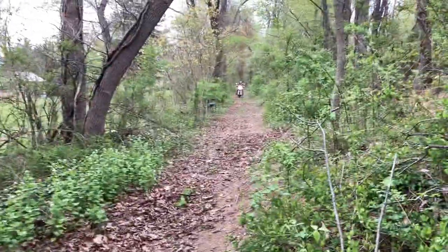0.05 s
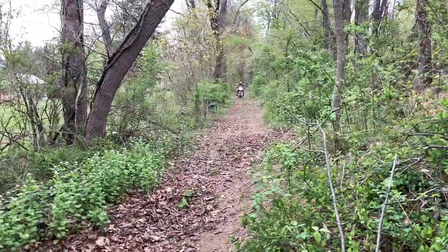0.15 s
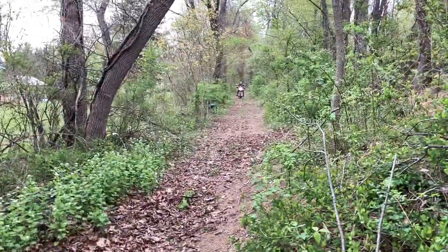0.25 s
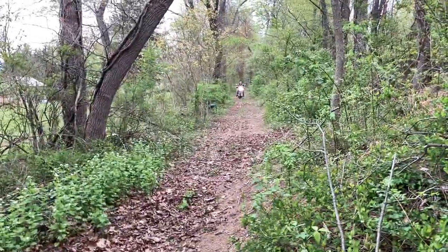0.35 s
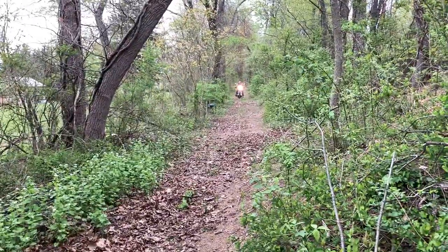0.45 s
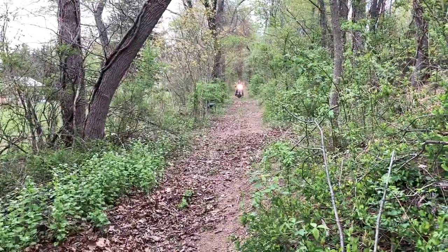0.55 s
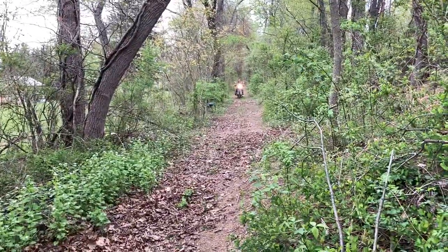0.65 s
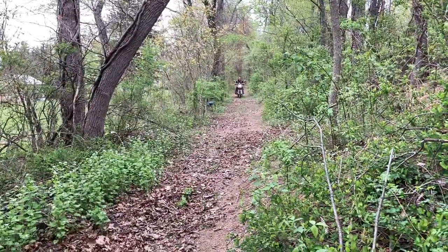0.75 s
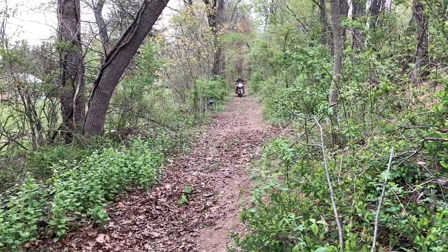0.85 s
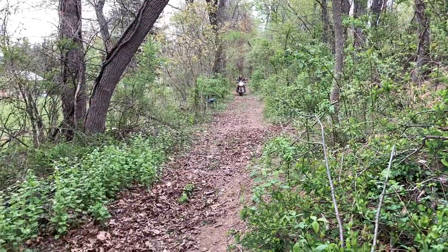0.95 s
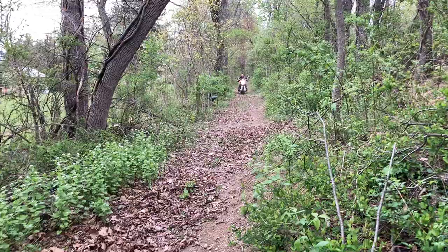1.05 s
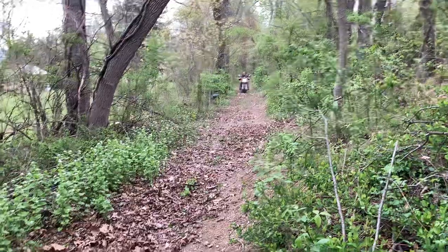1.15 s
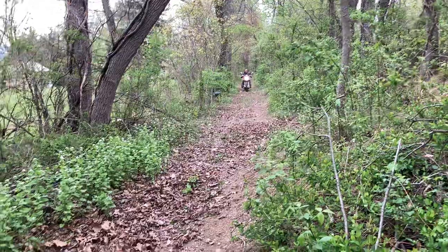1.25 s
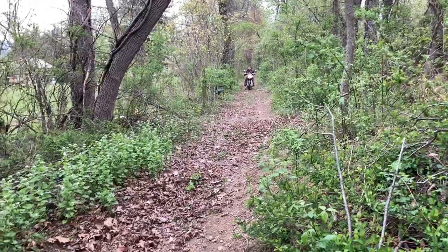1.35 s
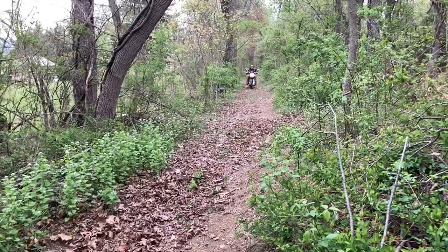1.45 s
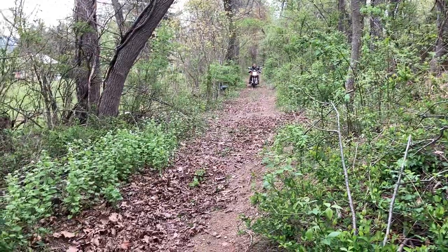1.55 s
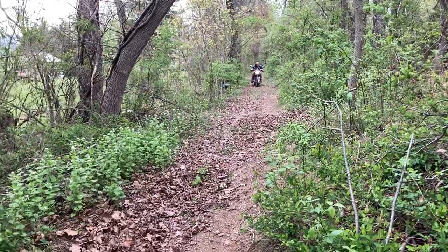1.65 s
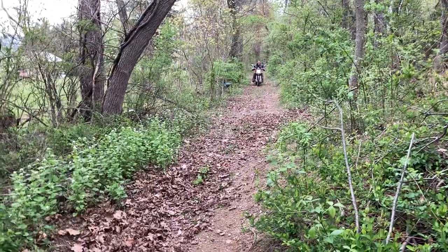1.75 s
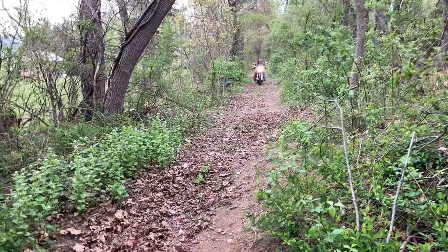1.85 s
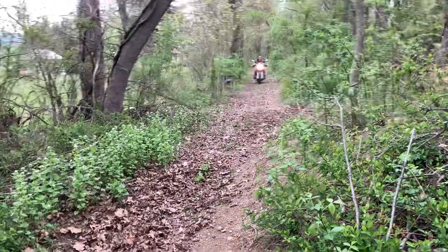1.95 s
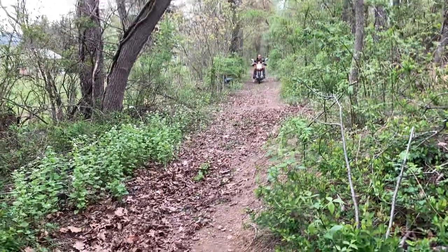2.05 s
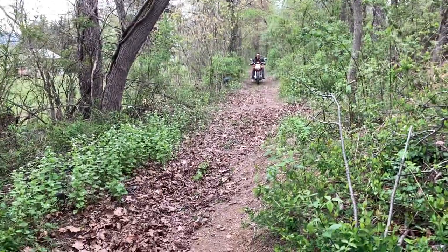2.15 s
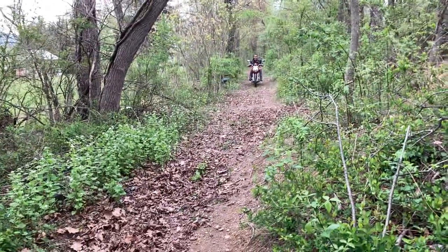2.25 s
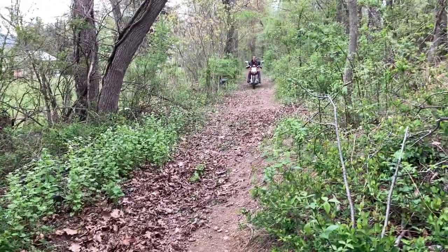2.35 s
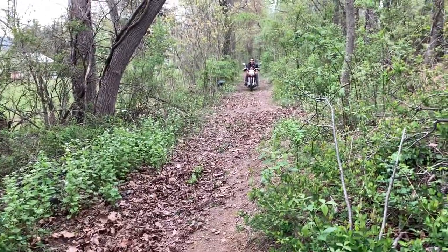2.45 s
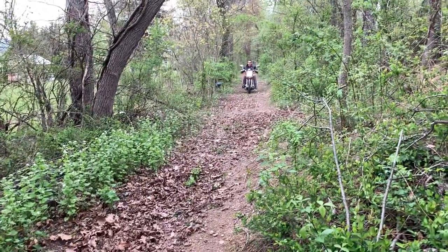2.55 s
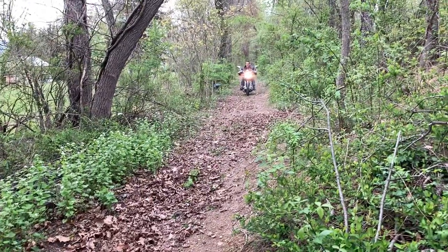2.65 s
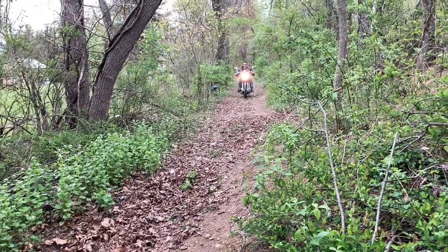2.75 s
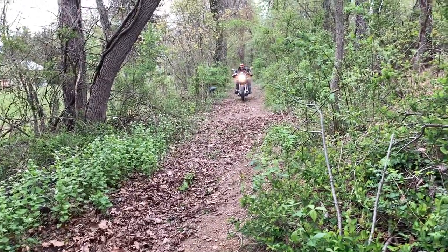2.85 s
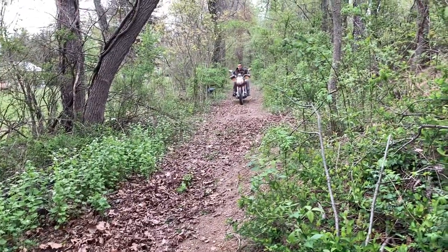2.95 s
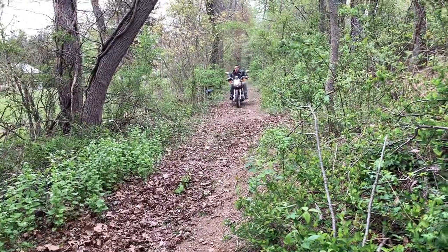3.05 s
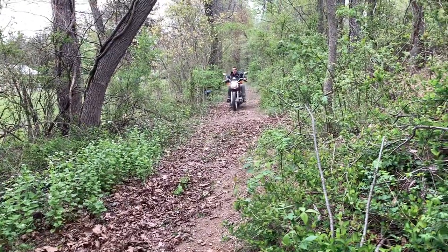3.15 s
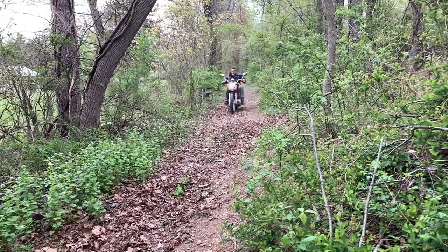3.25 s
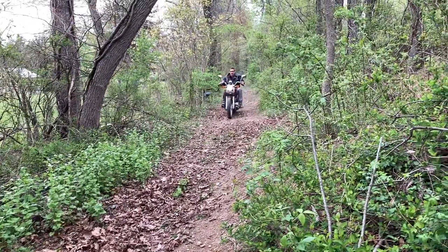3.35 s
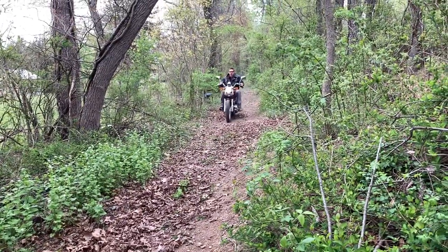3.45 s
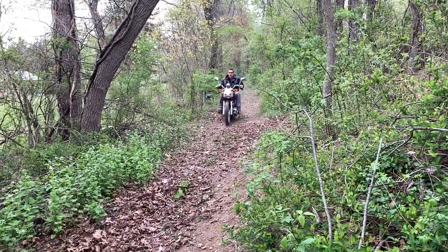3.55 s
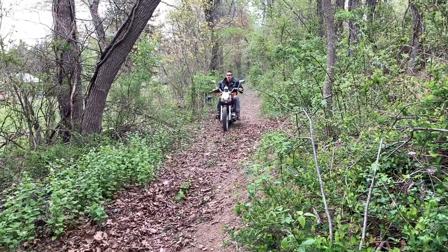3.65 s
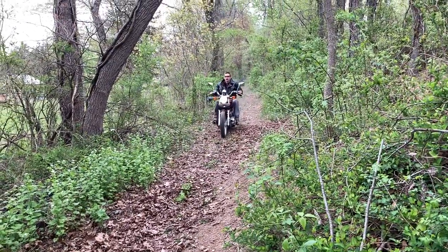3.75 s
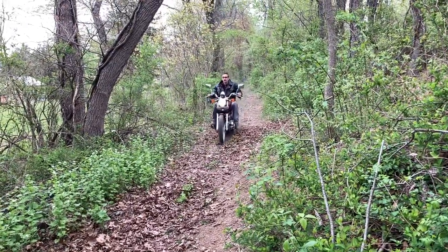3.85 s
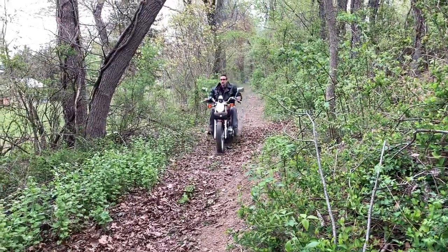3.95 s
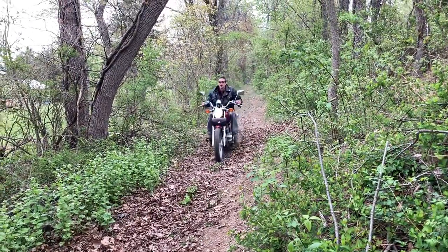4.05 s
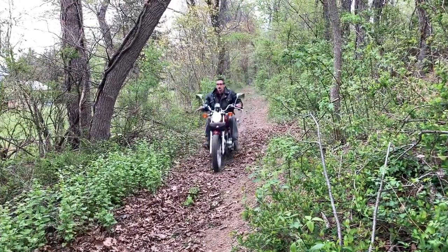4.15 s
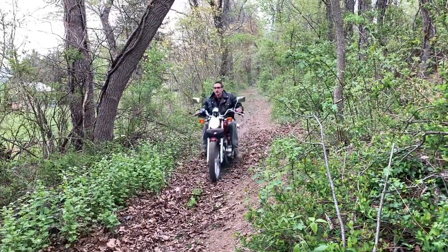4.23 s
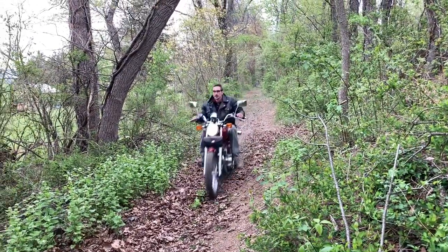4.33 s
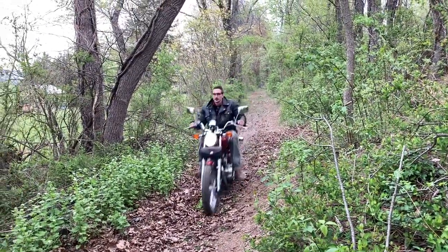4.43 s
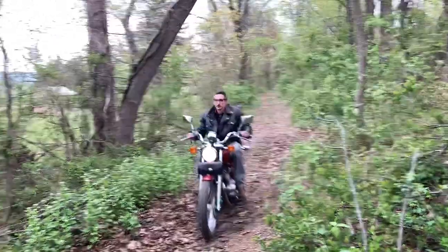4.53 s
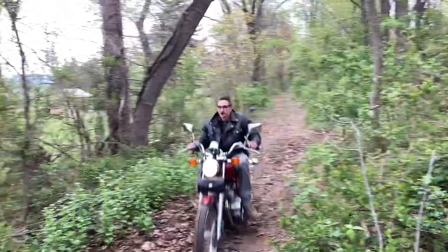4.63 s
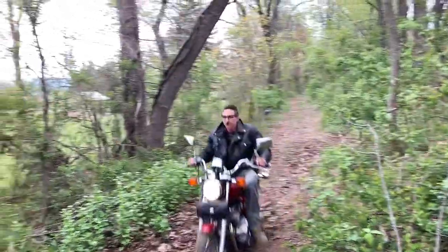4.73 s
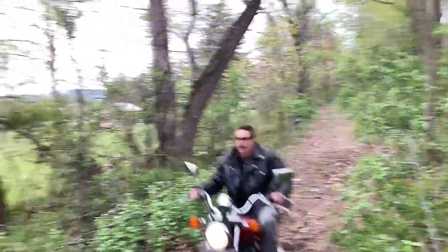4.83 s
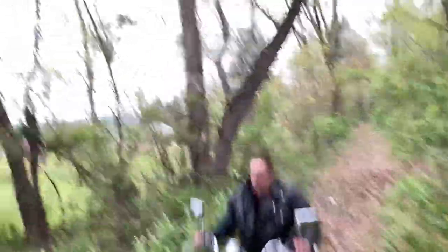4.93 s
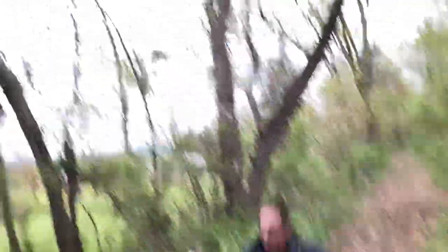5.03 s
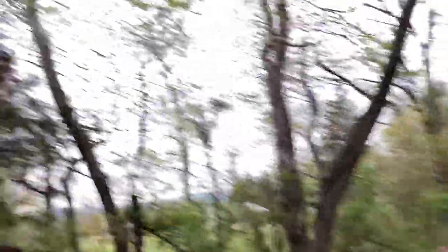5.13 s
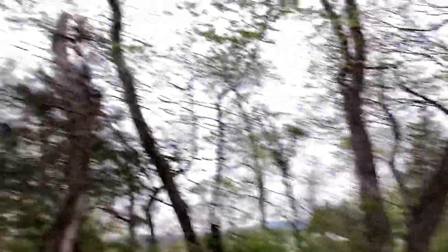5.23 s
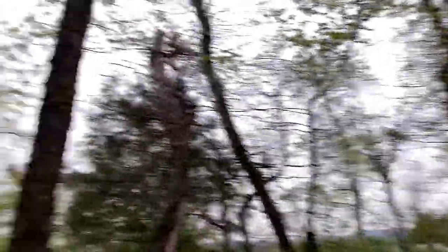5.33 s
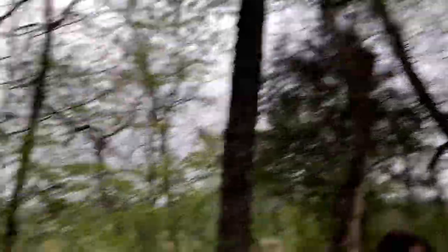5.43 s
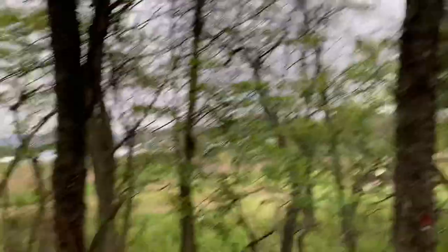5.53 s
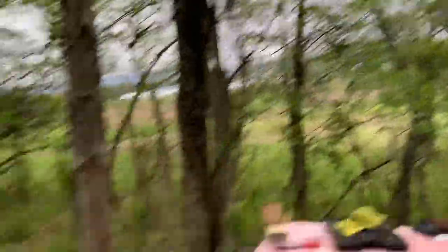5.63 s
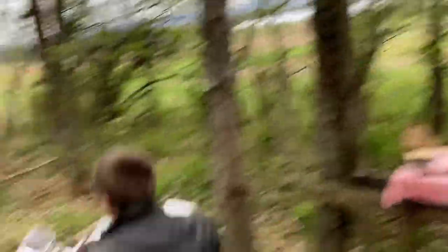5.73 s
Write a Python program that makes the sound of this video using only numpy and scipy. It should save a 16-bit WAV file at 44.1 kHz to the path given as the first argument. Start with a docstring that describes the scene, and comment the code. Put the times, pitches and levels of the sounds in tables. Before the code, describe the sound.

A twin-cylinder motorcycle burbles closer along a leafy trail, passes very near with leaves crunching and twigs snapping, its revs sagging to slow chugs.

```python
"""Motorcycle passing on a leafy woodland trail

A twin-cylinder machine comes along the trail at uneven throttle and passes close by a handheld stereo microphone,
its revs sagging. Locked tones make the exhaust orders, and ringing pulses the unequal firings; noise and ticks ring
the metal, and a sine makes the gear whine. Flickering noise with crackles is dry leaves under the tyres, short
bursts are twigs and a jolting frame, damped swings are stumbles in the firing, and low noise is air shoved at the mic.
"""
import sys
import numpy as np
from scipy import signal
from scipy.fft import rfft, irfft, next_fast_len
from scipy.io import wavfile
from scipy.ndimage import uniform_filter1d

SR = 44100
rng = np.random.default_rng(int(sys.argv[2]) if len(sys.argv) > 2 else 0)


def master_out(mix):
    """Clip the mix to full scale and print it as 16-bit PCM to the path in sys.argv[1]."""
    frames = np.transpose(np.atleast_2d(mix))
    ceiling = np.clip(frames, -1, 1)
    pcm = np.round(ceiling * 32767).astype(np.int16)
    wavfile.write(sys.argv[1], SR, pcm)


N = 255053

# Low push of air at the microphone: (time [s], level [dB])
AIR_PUSH = [(0, -62), (3, -53.5), (4.5, -58.5), (5.0, -48.5), (5.3, -44), (5.55, -28), (5.68, -31),
            (5.78, -21)]
# Twigs snapping: (time [s], level before the trim in snaps [dB], time to fall 60 dB [s])
TWIG_SNAPS = [(2.0384, -25.5, 0.1), (5.025, -25, 0.048), (5.5847, -20, 0.1), (5.6382, -20.5, 0.07),
              (5.6884, -24, 0.061), (5.712, -27.5, 0.071), (5.7534, -28.5, 0.052)]
# Spectrum of leaves under the tyres: (frequency [Hz], relative level [dB])
LEAF_SPECTRUM = [(300, -67), (800, -3.5), (2300, -11), (3500, -10.5), (4800, -1), (5700, -1), (6300, -1.5),
                 (6900, 5.5), (7700, 5), (8500, -1), (9400, 3), (10700, 1), (12500, -8.5), (14000, -14),
                 (16000, -17.5)]
# Single metal tones flaring up: (time [s], frequency [Hz], width [Hz], level [dB], half length [s])
METAL_FLARES = [(3.58, 1466, 70.2, -41, 0.13), (4.979, 2340, 90.1, -29.5, 0.089),
                (5.164, 1273, 49.96, -27, 0.028), (5.254, 1042, 30, -28, 0.046),
                (5.143, 2540, 200, -28, 0.03), (5.332, 2570, 150, -32, 0.073)]
# Jolts of the frame over a root: (time [s], level before smoothing [dB], time to fall 60 dB [s])
FRAME_JOLTS = [(5.45, -19.5, 0.23), (5.575, -23.5, 0.24), (5.6, -16.5, 0.19), (5.62, -33, 0.25),
               (5.655, -25.5, 0.23), (5.712, -29, 0.21), (5.735, -29, 0.23)]
# Modes of the rattling frame: (frequency [Hz], width [Hz], relative level [dB])
FRAME_MODES = [(356, 48, 10), (567, 140, -4.5), (802, 67, -1), (1080, 43, -18)]
# Modes of the engine cases (first four) and cooling fins: (frequency [Hz], width [Hz], relative level [dB])
METAL_MODES = [(924, 224, -6.5), (1343, 135, -3.5), (1483, 82, -1.5), (1966, 174, -4), (2235, 88, 0.5),
               (2655, 154, 1.5), (2907, 43, 2.5), (3223, 510, -2.5), (4096, 350, -2), (4666, 490, -4.5)]
# Modes of the rasping flank: (frequency [Hz], width [Hz], relative level [dB])
RASP_MODES = [(1000, 63, 3), (1187, 72, -1), (1276.6, 20, 0), (1650, 120, -2.5), (2158.4, 145, 2.5),
              (2370, 200, -0.5), (2345, 54, 6), (2633, 15, 0)]
# Resonances of the exhaust pipe: (frequency [Hz], width [Hz], relative level [dB])
PIPE_MODES = [(172, 154, 0), (550, 160, -9), (780, 72, -9.5)]
# Stumbles in the firing, each a dull puff with a dent in the note:
# (time [s], level before the band-pass [dB], pitch [Hz], time to fall 60 dB [s], dent of the lowest order [dB])
STUMBLES = [(2.299, -27, 140, 0.049, -1), (3.624, -20, 134.9, 0.058, 2), (4.178, -17.5, 120.1, .06, 0.5),
            (4.615, -8, 130, 0.067, 4), (5.003, -4.5, 147, 0.027, 2), (5.445, -12, 129.9, 0.055, 1.5),
            (5.65, -3.5, 107.7, 0.12, 2.5)]
# The rider's hand: (time [s], firing rate [Hz], load on the engine [dB])
THROTTLE_HAND = [(0, 95.3, -1.5), (.37, 93.7, -1.5), (.69, 93.6, -1), (.87, 87.55, -1), (1.05, 96.6, 0),
                 (1.17, 93.4, 0), (1.35, 93.6, -0.5), (1.53, 91.74, -1), (1.66, 93.8, -0.5),
                 (1.8, 93.95, 0.5), (1.95, 97.4, 0.5), (2.12, 88.9, 0), (2.18, 90.8, -0.5),
                 (2.42, 84.4, -1), (2.62, 90.4, -1), (2.74, 96.3, 2), (2.78, 98.1, 1), (2.9, 91, 1.5),
                 (3.12, 91.5, 0.5), (3.27, 94.6, 1.5), (3.6, 92.2, 1.5), (3.75, 80.75, -0.5),
                 (4.15, 79.5, -0.5), (4.28, 80.93, -.5), (4.53, 80.1, -1), (4.65, 73.4, -2.5),
                 (4.8, 79.93, -0.5), (4.92, 85.53, 0.5), (5.03, 77.8, 0.5), (5.15, 69.9, -.5),
                 (5.28, 72.96, 0), (5.42, 64.9, -0.5), (5.57, 49.67, 1), (5.66, 37, 0.5),
                 (5.78, 35.2, -1.5)]

# How each part carries to the microphone: (time abreast [s], nearest distance [m], level at 1 m [dB],
# loss per doubling of distance [dB], share of the load [dB per dB], fade once past [dB per s])
TYRE_CARRY = (5, 1.15, -24.5, 6, 0.74, 6.5)
CRISP_CARRY = (5, 2.4, -24.5, 10, 1, -2.5)
WHINE_CARRY = (6, 11, -32, 5.5, 4.5, 3)
CASE_CARRY = (5, 1.56, -26, 6, 1.68, -3)
FIN_CARRY = (5.08, 0.77, -32, 4, 1.56, -2)
RASP_CARRY = (5, 1.3, -23.5, 10, -0.7, -1)
FRONT_CARRY = (5, 3, -28, 6, 1.7, -4)
EXHAUST_CARRY = (5.3, 2.1, 0, 6, 1, 0)

# Exhaust colour, held for a stretch: (start [s], orders 1 to 5 at 1 m [dB] x 5, cylinder mismatch at 1 m [dB])
EXHAUST_COLOUR = [(0, -2.5, -16.5, -21, -29, -33, -29), (.76, -2.5, -19, -19, -22.5, -31, -30),
                  (1.25, -2.5, -15, -22, -23, -28.5, -24.5), (1.72, -2.5, -13, -18.5, -22, -33, -26),
                  (2.03, -2.5, -19.5, -22.5, -20, -29.5, -26), (2.68, -4, -16, -15.5, -21, -27.5, -27),
                  (3.22, -5, -16.5, -15, -18, -29, -27.5), (3.625, -9, -4.5, -14.5, -18, -32.5, -24),
                  (4.178, -6.5, -18.5, -17, -16, -32.5, -20.5), (4.605, -5, -13, -13.5, -16, -28, -20.5),
                  (4.999, -9.5, -8, -20, -23.5, -30.5, -17), (5.435, -8.5, -7, -23, -33, -33, -19.5),
                  (5.58, -21, -10, -14.5, -29, -32.5, -39)]
# Overtones sliding against the lowest order as the path from the pipes turns:
# (time [s], lag [rad], spread [rad])
OVERTONE_SLIDE = [(0, 0, .27), (3.55, 0, .2), (3.7, 2, .15), (4.2, 2.2, 0), (4.95, 2.4, 0), (5.05, 3.6, 0),
                  (5.78, 4.5, 0)]
# Brief drops of the second order: (time [s])
SECOND_ORDER_DROPS = [.05, .25, .46, 1.41, 1.58, 1.74, 1.87, 1.98, 2.17, 2.33, 2.62]
# Ebbs of the lowest order: (time [s])
LOWEST_ORDER_EBBS = [.4, .68, 1.05, 1.41, 1.68, 1.97, 2.38]
# Slow flicker of orders 1 to 8 with distance along the trail: (spread [dB per m])
ORDER_FLICKER = [.01, 0.057, 0.052, 0.06, 0.096, 0.13, 0.23, 0.17]
# Orders 6 to 8 against order 5: (level [dB])
UPPER_ORDERS = [-5, -9, -13.5]

# Stereo phase of left against right; the treble is wide, partly in opposite phase:
# (frequency [Hz], phase [rad])
STEREO_PHASE = [(20, 0), (4400, 0), (5600, 2.2), (6100, 1.8), (6400, 0), (7300, -.1), (8400, -2.9),
                (8900, -np.pi), (9500, -3.3), (10700, -5.7), (11200, -2 * np.pi), (11600, -2 * np.pi),
                (13000, -8.7), (13300, -3 * np.pi), (14300, -3 * np.pi), (15100, -4 * np.pi)]
# Left channel against the right: (frequency [Hz], level [dB])
STEREO_BALANCE = [(60, -1), (200, -0.51), (700, 1), (2400, 1), (4400, 0.087)]
# Diffuse stereo part against the centred part: (frequency [Hz], level [dB])
DIFFUSE_SHARE = [(30, 14), (70, -30.5), (270, -20), (740, -12), (1500, -8), (3000, -4.5), (3600, -18.5),
                 (5300, -5.5), (6200, 5), (6800, -66), (8100, 4), (8900, -34), (9500, -22), (10400, 15.5),
                 (11400, -35), (12700, -20), (13300, -24), (14200, -30), (14700, 14), (15500, -13)]

SPEED_M_PER_S = 5.05
TURN_S = 0.026  # time for one exhaust colour to turn into the next
STUMBLE_HALF_S, STUMBLE_LEAD_S = 0.028, 0.013  # the dent is centred ahead of its puff
SAG_PER_ORDER = 0.47  # each higher order sags more by this share
DROPOUT_DB, DROPOUT_HALF_S = 15.5, 0.026
EBB_DB, EBB_HALF_S = 3, 0.1
FLICKER_PER_S = 8.72
WHINE_ORDER = 21  # multiple of the firing rate
CUTOFF_HZ = 16284


def amp(db):
    """Amplitude ratio of a level in dB."""
    return 10 ** (np.asarray(db) / 20)


def rms_one(x):
    """Scale a signal to an RMS of 1."""
    return x / np.sqrt(np.mean(x ** 2) + 1e-20)


def in_time(rows):
    """Columns of a timed table, joined by straight lines at every sample."""
    s, *columns = np.transpose(rows)
    return [np.interp(np.arange(N) / SR, s, c) for c in columns]


def at_hz(points, hz):
    """Curve of a spectral table, straight over log frequency."""
    point_hz, values = np.transpose(points)
    return np.interp(np.log(hz + 1), np.log(point_hz), values)


def drift(rate):
    """Slow chance of spread 1, changing about rate times a second."""
    r = np.exp(-2 * np.pi * rate / SR)
    slow = signal.lfilter([1], [1, -2 * r, r * r], rng.standard_normal(N + SR))
    return rms_one(slow[SR:])  # the first second is run-in


def resonate(x, modes):
    """Parallel resonances with alternating signs."""
    out = 0
    for k, (hz, width_hz, level_db) in enumerate(modes):
        r = np.exp(-np.pi * width_hz / SR)
        b = (1 - r * r) / 2 * np.array([1, 0, -1])
        a = [1, -2 * r * np.cos(2 * np.pi * hz / SR), r * r]
        out = out + (-1) ** k * amp(level_db) * signal.lfilter(b, a, x)
    return out


def band(x, low_hz, high_hz, order=2):
    """Band-pass filter."""
    sos = signal.butter(order, [low_hz, high_hz], "band", fs=SR, output="sos")
    return signal.sosfilt(sos, x)


def bursts(rows, crack_db):
    """Level of sudden events that die away, each with a short crack on its front."""
    level = np.zeros(N)
    for s, level_db, t60 in rows:
        i = round(s * SR)
        t = np.arange(N - i) / SR
        level[i:] += amp(level_db - 60 * t / t60)
        level[i:] += amp(level_db + crack_db - 60 * t / 0.032)
    return level


def dips(rows, half_s):
    """Short bell-shaped changes of level in dB, from rows of time and depth; a negative depth lifts."""
    t = np.arange(N) / SR
    return -sum(depth_db * np.exp(-((t - s) / half_s) ** 2) for s, depth_db in rows)


def carried(part, load_db):
    """Level of a part in dB: loss with distance, engine load, and a fade or rise once it has gone by."""
    abreast_s, nearest_m, level_db, loss_db, share, fade_db_per_s = part
    past = np.arange(N) / SR - abreast_s
    metres = np.hypot(SPEED_M_PER_S * past, nearest_m)
    return level_db - loss_db * np.log2(metres) + share * load_db - fade_db_per_s * np.maximum(past, 0)


def firings(turns):
    """Number of the current firing, and a mark on the sample where each one falls."""
    count = np.floor(turns).astype(int)
    return count, np.diff(count, prepend=0) > 0


def air_push():
    """Air shoved at the microphone is low-frequency noise."""
    level_db, = in_time(AIR_PUSH)
    return amp(level_db) * rms_one(band(rng.standard_normal(N), 37.6, 73, order=4))


def snaps():
    """Each twig gives a crack, then bright splinter noise that dies fast."""
    splinters = rms_one(band(rng.standard_normal(N), 1400, 7500, order=1))
    return bursts(TWIG_SNAPS, crack_db=5.0) * splinters * amp(-8.5)


def leaves(body_db, crisp_db, per_s=2500, spread_db=3.0, crackle=0.55, patchy_db=1.06, crisp_hz=8600):
    """Crushed leaves hiss densely with uneven crackles; bands flicker apart, the crisp top with its own level."""
    sizes = amp(spread_db * np.minimum(rng.exponential(1, N), 5)) * rng.choice([-1, 1], N)
    grains = rms_one(sizes * (rng.random(N) < per_s / SR))
    hz = np.fft.rfftfreq(N, 1 / SR)
    crush = rfft(rng.standard_normal(N) + crackle * grains) * amp(at_hz(LEAF_SPECTRUM, hz))
    edges = np.geomspace(250, 17000, 13)
    together = drift(8)
    body, crisp = np.zeros(N), np.zeros(N)
    for low, high in zip(edges, edges[1:]):
        flicker = amp(patchy_db * (0.61 * together + drift(56)))
        part = crisp if low > crisp_hz else body
        part += flicker * irfft(crush * (hz >= low) * (hz < high), N)
    return amp(body_db) * rms_one(body) + amp(crisp_db) * rms_one(crisp)


def flares():
    """Single metal tones are noise in one narrow mode, swelling and fading."""
    t = np.arange(N) / SR
    out = np.zeros(N)
    for s, hz, width_hz, level_db, half_s in METAL_FLARES:
        tone = rms_one(resonate(rng.standard_normal(N), [(hz, width_hz, 0)]))
        out += amp(level_db) * np.exp(-((t - s) / half_s) ** 2) * tone
    return out


def jolts():
    """Loose parts shaken over a root sound in the modes of the frame."""
    rattle = rms_one(resonate(rng.standard_normal(N), FRAME_MODES))
    # averaging over 600 samples lets each shake build over some 10 ms
    return rattle * uniform_filter1d(bursts(FRAME_JOLTS, crack_db=-15.0), size=600)


def whine(turns, level_db, waver_db=1.0, wobble=.25):
    """A gear meshes at a fixed multiple of the firing rate: a thin, unsteady tone (wobble in radians)."""
    phase = 2 * np.pi * WHINE_ORDER * turns + wobble * drift(15)
    return amp(level_db + waver_db * drift(4)) * np.sin(phase)


def clatter(turns, level_db, modes, gate, tick, patchy_db, per_s):
    """Gear noise swelling on each firing, and a valve tick with it, ring metal modes that come and go apart."""
    gears = rng.standard_normal(N) * (1 + gate * np.cos(2 * np.pi * turns))
    _, fires = firings(turns)
    ticks = rms_one(fires * (1 + 0.39 * rng.standard_normal(N)))
    drive = gears + tick * ticks
    rings = 0
    for k, mode in enumerate(modes):
        rings = rings + (-1) ** k * amp(patchy_db * drift(per_s)) * resonate(drive, [mode])
    return amp(level_db) * rms_one(rings)


def puffs():
    """Each stumble in the firing is one damped swing of air."""
    out = np.zeros(N)
    for s, level_db, hz, t60, _ in STUMBLES:
        i = round(s * SR)
        t = np.arange(N - i) / SR
        out[i:] += amp(level_db - 60 * t / t60) * np.sin(2 * np.pi * hz * t)
    return band(out, 82, 340)


def firing_pulses(turns, mismatch_db, sharp_db, rough=0.47, sharp_rough=0.5, breath=0.098):
    """Unequal cylinders sound half orders; the front of each firing and the gas rush ring the pipe."""
    count, fires = firings(turns)
    chance = rng.standard_normal((count[-1] + 1, 2))[count]  # one pair of draws per firing
    rush = breath * rng.standard_normal(N)
    mismatch = fires * ((-1.) ** count + rough * chance[:, 0])
    # twice through the pipe: the muffler leaves no click
    mismatch = resonate(resonate(mismatch, PIPE_MODES[:1]), PIPE_MODES[:1])
    fronts = fires * (1 + sharp_rough * chance[:, 1])
    sharp = band(resonate(fronts + rush, PIPE_MODES[1:]), 410, 840, order=3)
    return amp(mismatch_db) * rms_one(mismatch) + amp(sharp_db) * rms_one(sharp)


def exhaust_tone(load_db):
    """Held colours turn one into the next; stumbles dent all orders, which flicker more the farther off."""
    rows = [(s + TURN_S / 2, *after) for s, *after in EXHAUST_COLOUR]
    for (_, *before), (s, *_) in zip(EXHAUST_COLOUR, EXHAUST_COLOUR[1:]):
        rows.append((s - TURN_S / 2, *before))
    *orders_db, mismatch_db = np.array(in_time(sorted(rows))) + carried(EXHAUST_CARRY, load_db)

    dents = dips([(row[0] - STUMBLE_LEAD_S, row[-1]) for row in STUMBLES], STUMBLE_HALF_S)
    orders_db = orders_db + np.outer(1 + SAG_PER_ORDER * np.arange(len(orders_db)), dents)
    orders_db[0] += dips([(s, EBB_DB) for s in LOWEST_ORDER_EBBS], EBB_HALF_S)
    orders_db[1] += dips([(s, DROPOUT_DB) for s in SECOND_ORDER_DROPS], DROPOUT_HALF_S)
    upper_db = [orders_db[-1] + level_db for level_db in UPPER_ORDERS]
    orders_db = np.vstack([orders_db] + upper_db)

    metres = SPEED_M_PER_S * np.abs(np.arange(N) / SR - EXHAUST_CARRY[0])
    flicker_db = [db_per_m * metres * drift(FLICKER_PER_S) for db_per_m in ORDER_FLICKER]
    return orders_db + flicker_db, mismatch_db


def exhaust_note(turns, orders_db, waver_db=0.3951):
    """The low orders are clean tones locked into one pulse shape; the higher ones waver more."""
    lag, spread = in_time(OVERTONE_SLIDE)
    note = np.zeros(N)
    for k, level_db in enumerate(orders_db):
        level = amp(level_db + waver_db * (k + 2.4) * drift(28.5))
        phase = 2 * np.pi * (k + 1) * turns - lag * (k > 0) + spread * k * k
        note -= np.sqrt(2) * level * np.cos(phase)
    return note


def scene():
    """Leaves, clatter, whine and exhaust follow one throttle; twigs, flares, jolts, puffs and air have own times."""
    rate_hz, load_db = in_time(THROTTLE_HAND)
    turns = np.cumsum(rate_hz) / SR  # firings so far
    orders_db, mismatch_db = exhaust_tone(load_db)

    mix = air_push() + snaps()
    mix += leaves(carried(TYRE_CARRY, load_db), carried(CRISP_CARRY, load_db))
    mix += flares() + jolts()
    mix += whine(turns, carried(WHINE_CARRY, load_db))
    mix += clatter(turns, carried(CASE_CARRY, load_db), METAL_MODES[:4],
                   gate=0.044, tick=0.56, patchy_db=1.43, per_s=6.8)
    mix += clatter(turns, carried(FIN_CARRY, load_db), METAL_MODES[4:],
                   gate=0.062, tick=0.33, patchy_db=1.6, per_s=7.3)
    mix += clatter(turns, carried(RASP_CARRY, load_db), RASP_MODES,
                   gate=0.13, tick=0.22, patchy_db=0.5, per_s=8.1)
    mix += puffs()
    mix += firing_pulses(turns, mismatch_db, carried(FRONT_CARRY, load_db))
    mix += exhaust_note(turns, orders_db)
    return np.array([mix, mix])


def record(dry, smear_s=0.032, paths=6):
    """Diffuse sound is opposite in left and right; the treble is wide, partly in opposite phase; the top is cut."""
    size = next_fast_len(N + SR // 2)
    hz = np.fft.rfftfreq(size, 1 / SR)
    t = np.arange(SR // 4) / SR
    side = np.array([[1], [-1]])  # left, right
    share = amp(at_hz(DIFFUSE_SHARE, hz))
    centred = rfft(dry, size)

    smears = rng.standard_normal((paths, len(t))) * np.exp(-t / smear_s)
    smears /= np.sqrt(paths * smear_s * SR / 2)
    # each diffuse path drifts in level by chance, so that the width stays restless
    diffuse = sum(drift(11) * irfft(centred[0] * rfft(smear, size), size)[:N] for smear in smears)

    turned = np.exp(.5j * side * at_hz(STEREO_PHASE, hz))
    balance = amp(side * at_hz(STEREO_BALANCE, hz) / 2)
    channels = turned * balance / np.sqrt(1 + share ** 2)  # makes room for the diffuse part
    wet = irfft(channels * (centred + side * share * rfft(diffuse, size)), size)[:, :N]
    return signal.sosfilt(signal.cheby2(20, 70, CUTOFF_HZ, fs=SR, output="sos"), wet)


dry = scene()
out = record(dry)
master_out(out)
```